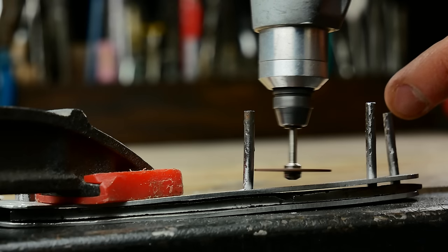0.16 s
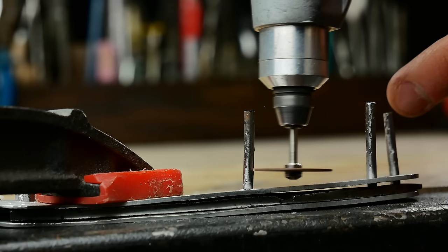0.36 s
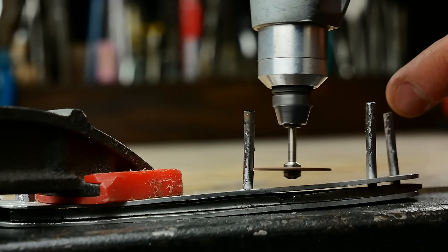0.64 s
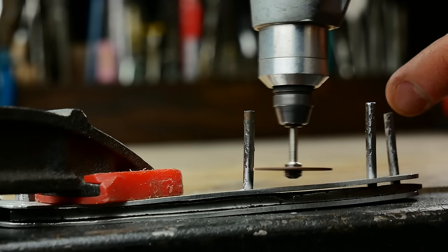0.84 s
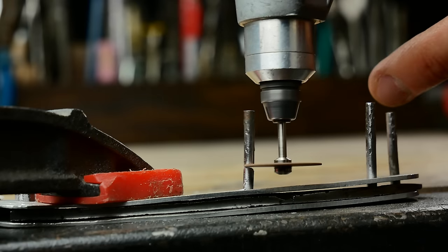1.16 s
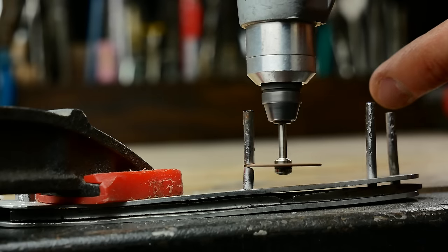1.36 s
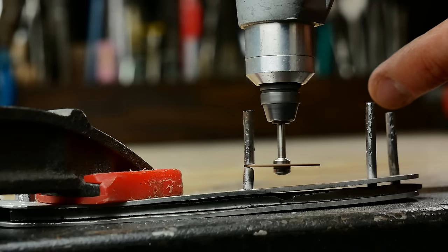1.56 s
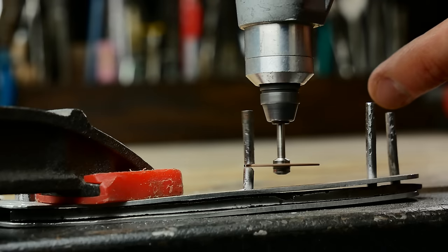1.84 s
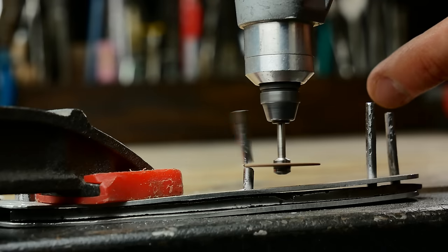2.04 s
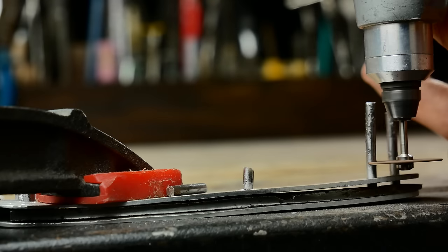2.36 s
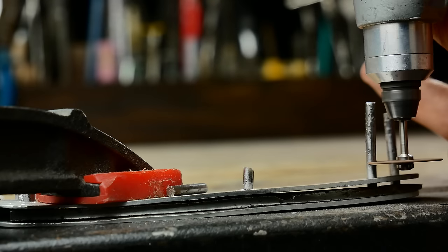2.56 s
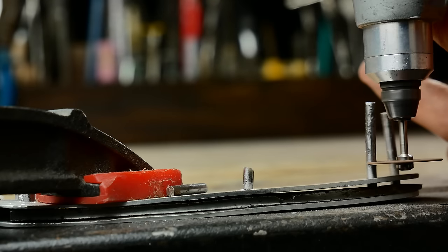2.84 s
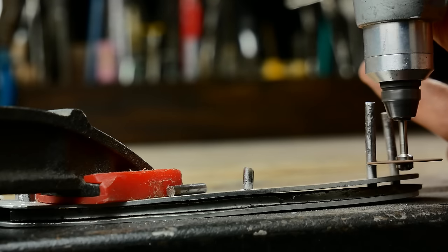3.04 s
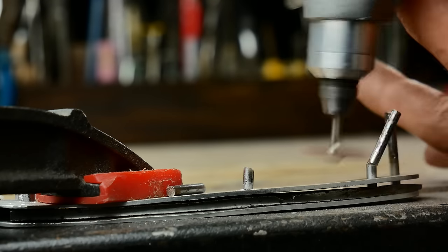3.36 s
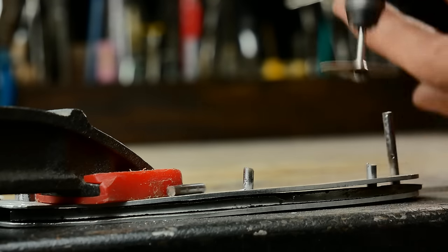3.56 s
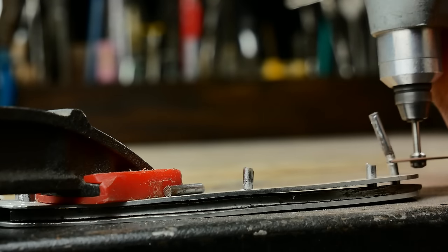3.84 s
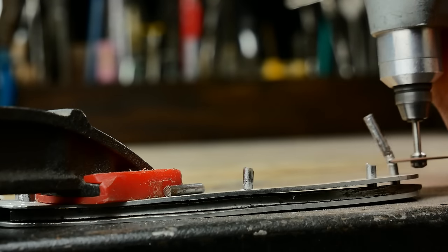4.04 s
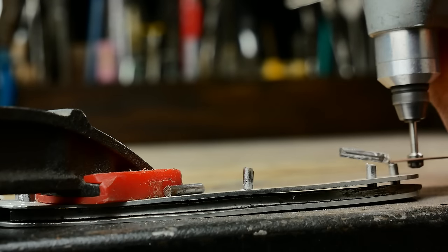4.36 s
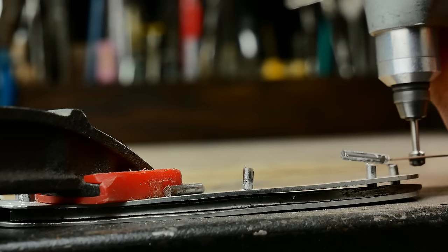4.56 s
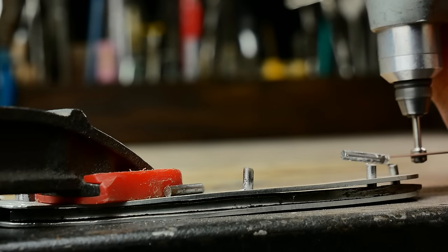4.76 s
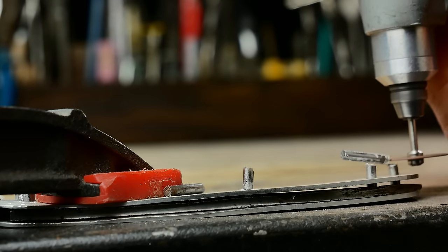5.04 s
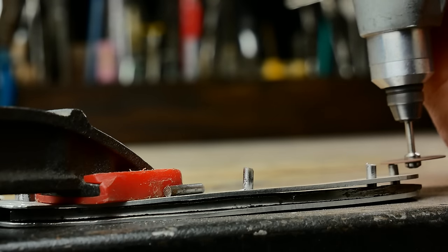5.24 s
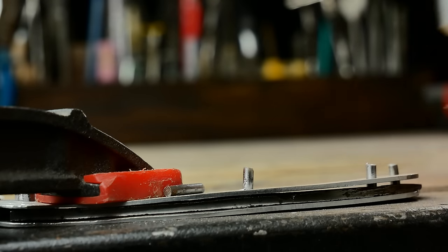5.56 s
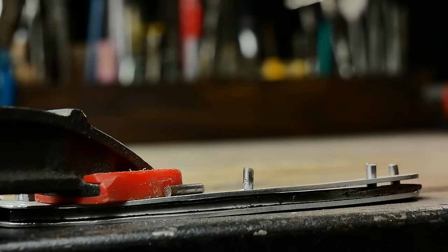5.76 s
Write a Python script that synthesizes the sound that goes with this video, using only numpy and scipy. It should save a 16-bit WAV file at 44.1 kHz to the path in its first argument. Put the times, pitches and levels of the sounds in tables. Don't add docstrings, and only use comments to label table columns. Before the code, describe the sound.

Close-up workshop metal cutting: a dragging, catching disc, then three abrupt high-speed grinding cuts, with snapping stubs, small metallic bounces and a free-running motor.

```python
import sys
import numpy as np
from scipy import signal
from scipy.fft import rfft, irfft, next_fast_len
from scipy.io import wavfile
from scipy.ndimage import uniform_filter1d, map_coordinates

SR = 44100
rng = np.random.default_rng(int(sys.argv[2]) if len(sys.argv) > 2 else 0)


def materialize(psi):
    bounded = np.clip(np.atleast_2d(psi).T, -1, 1)
    quanta = np.round(bounded * 32767).astype(np.int16)
    wavfile.write(sys.argv[1], SR, quanta)


def elevation(decibels):
    levels = np.asarray(decibels, float)
    return 10 ** (levels / 20)


N = 259749

STRETCH_S = [
    0,
    1.0015,
    2.4415,
    3.8015,
    5.9,
]

# first t/s, last t/s, first peak/dB, last peak/dB, length/ms
RUNS = [
    (0.174, 0.218, -22, -27, 0.55),
    (0.254, 0.345, -32, -28, 1.9),
    (0.6473, 0.784, -25, -33, 1),
    (0.842, 0.9816, -32, -33, 2.3),
]
# t/s, peak/dB, length/ms
BITES = [(.0098, -22.5, 1.5), (.0172, -20, 0.71), (.0327, -23, 1), (.04, -32, 1.1), (.0464, -32, 0.95),
         (.0616, -29, 1.3), (.0764, -31, 1), (.0822, -27, 2.4), (.0955, -30, 2.5), (.117, -32, 2.3),
         (.119, -29, 1.8), (.1444, -35, 2.2), (.149, -39, 2.3), (.179, -35, 1.4), (.2106, -39, 1.2),
         (.2328, -32, 2.4), (.2497, -30, 4.1), (.276, -26, 0.77), (.3, -20.5, 0.87), (.322, -27, 1.7),
         (.5944, -22, 1.6), (.5985, -19, 1.7), (.6186, -21, 2), (.668, -29, 0.66), (.6878, -21, 1.8),
         (.7132, -18, 0.84), (.753, -38, 1.6), (.775, -21.5, 1.8), (.782, -24, 2), (.797, -21.5, 1.9),
         (.8143, -33, 1.6), (.8205, -35, 1.6), (.8284, -43, 1.7), (.889, -21, 0.49), (.9113, -14.5, 0.56)]
# t/s, peak/dB, length/ms
LISTED_RUN = [(0.366, -25.5, 2.4), (0.389, -28, 2.6), (0.4137, -23, 1.9), (0.436, -21, 1.8), (.4595, -24, 2.6),
              (.484, -21.5, 1.2), (0.506, -21.5, 1.9), (.53, -23, 1.7), (0.5539, -19.5, 1.2), (.577, -25, 1.2)]
# f/Hz, density/dB
CATCH = [(300, -32.5), (820, -11.5), (1200, -13.5), (2900, -4), (3650, -5), (4400, -7.5), (5200, -9.5),
         (7250, 8.5), (8500, 6.5), (10300, -6), (11500, -9.5), (13400, -10), (14700, -6.5), (15600, -16.5)]
# f/Hz, width/Hz, level/dB, rise/(dB/s)
EDGE_RING = [
    (7760, 1000, -12, 3.5),
    (3040, 1800, -24, -12),
]
# t/s, level/dB
DRAG_DB = [(0, -34.5), (.5, -35), (1, -38.5)]
# f/Hz, density/dB
DRAG = [(20, -75.5), (60, -36), (230, -12.5), (700, -1.5), (1150, -6), (1600, 0.5), (2500, 0.5),
        (4400, 0.5), (5200, -5), (6300, -7), (8400, -6), (10300, 3), (11000, -9), (13500, -11),
        (15500, -5.5)]
SLOW_TURNS_PER_S = 43.5
USUAL_DB = -26
BODY_DB, BODY_GROWS, TOP_DB, TOP_GROWS, SCATTER_DB = -5, 0.062, 0.5, 0.31, 1.5

# f/Hz, t60/s
SHOP = [(200, 0.88), (4000, 0.4), (12000, 0.0087)]
DIP_SHARE = [.7, .8, .45, .4]

# t/s, speed/(turns/s)
SPEED = [
    [(1, 123.2), (1.26, 127.4), (1.4, 131.2), (1.63, 140), (1.95, 142.5), (2.1, 140), (2.22, 135.5),
     (2.34, 142.7), (2.44, 143.7)],
    [(2.45, 106.3), (2.56, 107.4), (2.9, 103.2), (2.98, 104.6), (3.2, 104.6), (3.4, 103.5), (3.48, 99),
     (3.56, 125), (3.67, 142)],
    [(3.8, 127.8), (4.03, 129.6), (4.21, 128), (4.41, 131.5), (4.55, 136.7), (4.62, 141.8), (5.28, 143),
     (5.45, 139.7), (5.6, 142.6)],
]
# shaft multiple, level/dB rms
WHINE = [(2, -90), (24, -60.5), (31, -70), (33, -69), (36, -64), (37, -64), (47, -66), (49, -68), (59, -72),
         (60, -70), (72, -72)]
# shaft multiple, level/dB rms
TWELFTH = [(12, -64.5)]
TWELFTH_DB = [-21, 1, -1.5]
# f/Hz, density/dB
AIR = [(18, -95.5), (30, -67), (102, -32), (200, -30), (399, -20.5), (709, -6), (970, -9), (1170, -9),
       (1400, -9.5), (1680, -5.5), (2130, -9), (3200, -12), (3700, -10), (4000, -7.5), (5170, -11),
       (5700, -7), (6500, -7), (9400, -9), (10500, -7.5), (15500, -15.5)]
# f/Hz, width/Hz, level/dB, rise/(dB/s)
AIR_RINGS = [(4560, 200, -19, 8), (5200, 120, -19, 4), (6800, 270, -15, 1), (8280, 680, 1.5, -3)]
# t/s, air/dB, whine/dB
MOTOR = [(1, -47.5, 2), (1.7, -45, 5), (1.78, -48, 3.5), (2.08, -43, 9), (2.3, -46.5, 6), (2.44, -49, -3),
         (2.45, -34.5, 3), (3.8, -48.5, -1), (4.7, -47, 2), (5.25, -43, 6), (5.6, -43, 4.5),
         (5.89, -43.5, 7.5)]
FREE_SHAKE_DB = -87
LOADED_SHAKE_DB = [-76, -74, -81, -61]

# t/s, pressure (pin rasp)/dB, skim (rim hiss over rasp)/dB
PUSH = [(1.02, -33.5, 3), (1.2, -32, 4.5), (1.32, -31.5, 3.5), (1.52, -35.5, 7), (1.56, -42, 9),
        (1.6, -50, 12.5), (1.63, -70, 10)]
BREAK = [(2.07, -68, 8), (2.111, -35, 7.5), (2.145, -35.5, 7), (2.175, -28, 2.5), (2.24, -30, 3.5),
         (2.265, -42.5, -3), (2.3, -45.5, 0.5), (2.34, -51, -14)]
SECOND = [(2.46, -32.5, 2.3), (2.6, -31.5, 2.5), (3.3, -27.5, 1.3), (3.501, -27.5, 5), (3.56, -37, 4),
          (3.575, -38.5, -11), (3.6, -40.5, 0.5), (3.64, -50, -5), (3.68, -51, -27)]
THIRD = [(3.815, -35, 0.5), (3.87, -33, 0), (4.18, -30.5, 1), (4.35, -32, 3.5), (4.51, -32.5, 0.8),
         (4.54, -34, 1), (4.57, -40, -6), (4.61, -46.5, -10), (4.66, -63, 4)]
GRAZE = [(5.33, -26.5, -28), (5.35, -45, 18), (5.38, -41, 9), (5.4, -42, 4), (5.43, -40.5, 7.5),
         (5.49, -42, 5), (5.52, -58, 9), (5.55, -81, 8)]
# start t/s, length/s, pressure/dB, skim/dB
TOUCHES = [
    (1.597, 0.072, -38.5, 9.5),
    (1.669, 0.068, -34.5, 7),
    (1.75, 0.097, -43, 11.5),
    (1.862, 0.053, -48, 17),
    (1.949, 0.092, -44, 16.5),
    (2.017, .045, -41.5, 13),
    (2.066, 0.026, -41.5, 15),
]
LAND_S, SAG_DB_PER_S, LEAVE_DB_PER_S = 0.01, 58.5, 697
# f/Hz, density/dB
COLOURS = [
    [(150, -44), (380, -29), (800, -18.5), (1600, -16), (2400, -4.5), (3200, -6.5), (4300, -8), (5000, -4),
     (6000, -5), (7000, -10), (8500, -8.5), (9700, -5.5), (10350, -3), (11100, -4), (15500, -10)],
    [(88, -85), (150, -82), (308, -27.5), (519, -15), (668, -21.5), (827, -1.5), (1130, -13), (1340, -12.5),
     (1600, -5), (6470, -5), (7560, 0.5), (10700, -3.5), (12800, -7.5), (15500, -8)],
    [(88, -59), (150, -26), (213, -66), (381, -20), (595, -19), (781, -10), (1110, -13), (1760, 1.5),
     (2180, -1), (4220, 1), (5130, 0), (8330, -4), (15500, -0.5)],
    [(88, -52), (150, -31), (285, -23), (339, -54), (411, -19), (1020, -12), (1370, -6), (5330, -9),
     (9540, -7), (15500, 1)],
]
# f/Hz, width/Hz, level/dB, rise/(dB/s)
RINGS = [
    [(3910, 130, -7, -10), (4270, 120, -6, -2), (4530, 280, 0.5, -5), (5620, 660, -18, 7),
     (2570, 170, -11, -11), (7010, 110, 5, 2.5), (7540, 160, 5.5, 3), (8150, 99, -1.5, 5.5),
     (8530, 120, 3, -6), (6350, 110, -12, 6)],
    [(2290, 72, -16.5, 10.5), (4250, 38, -7, 3), (4510, 51, -4.5, 1.5), (5350, 51, -11, 4),
     (7500, 450, -9, 0.5), (9600, 110, -14, -5), (13000, 590, 6, -2.5)],
    [(1420, 26, -8.5, 16.5), (1770, 32, -11, -6), (3300, 30, -8, 4), (3880, 33, -10, -13),
     (4290, 55, 0, -11), (8270, 1730, 10, -7)],
    [(8900, 1800, 15, -2)],
]
RIMS = [
    [-28, -34, -11.5, -11.5, -37, -3, -5, -23, -5, -13, -25, -19, -14, -17, -21, -23, -20, -14, -12, 0, -1,
     -7, -10, -7, -20, -1, -14, -4, -12, 8, 6, -2, 10.5, -2, 10, 2, -2],
    [-24, -40, -12.5, -13, 4, -3, 9, 5, 5.5, -28, -2.5, -9, -20, 1.5, 3, -6, -11, -19, -21, -18, -1, -5,
     -16, -6, 4, -6, -17, -12, -15, -25, -17, -6, 5, -5, -10, -2, -14, -13, 6, -7, -5, -16, 0, -11],
    [-51, -61, -19.5, -37, -22, -10, -19, -16, -40, -33, -0.5, -6, -15, 5, -18, -26, -29, -30, -4, -24, -18,
     -6, -5, -7, -2, -4, -23, -23, -19, 0, -16, -1, 7, 0],
    [-30, -11, -2],
]
# shaft multiple, rise/(dB/s)
RIM_CHANGE = [
    [(31, -8), (35, -2)],
    [(5, 3), (7, -12), (8, -2), (9, -9), (15, -5), (16, 4), (22, 5)],
    [(11, -3), (14, -13), (26, 2), (30, 3), (33, 2)],
    [(1, 0)],
]
RIM_DB = [-3, -11, -8, -20]
RIM_WEAR_DB_PER_S = [4.9, 6.9, 1.4, .3]
RIM_GONE_S = [2.3, 3.45, 4.3, 5.6]
RIM_GOES_DB_PER_S = 30
REPEATING = [.9, .7, .6, .4]
# throb depth, added depth per dB of skim
THROBS = [
    (.13, .055),
    (.1, .01),
    (.2, .02),
    (.3, .02),
]
# level at full pressure/dB, share of pressure followed, loss per dB of skim/dB
DRONE = [
    (-56, 0.44, -0.23),
    (-34.5, 2.1, 2.5),
    (-54.5, 0.78, -1.65),
    (-60, 0.11, -1),
]
# shaft multiple, level against hiss/dB
SKIM_LINES = [(47, -19), (48, -16), (49, -13), (52, -19), (53, -16), (58, -21)]

# t/s, f/Hz, level/dB, t60/s
RING_OUTS = [
    (1.714, 842, -44, 0.18),
    (4.53, 1380, -53, .4),
]
# t/s, peak/dB, body/dB, top/dB, length/ms
SNAPS = [(2.2837, -26.5, -29, -17, 2.3), (3.5694, -23, -3.5, -5, 6.5), (3.581, -17, -7, 2, 1.4),
         (5.2928, -20.5, -1, -2, 1.8), (5.296, -18, 3, -2, 2), (5.3022, -19.5, -3, -15, 3.5),
         (5.32, -16.5, -10, -5, 2.6), (5.345, -26.5, -4, -8, 6.2), (5.3672, -21.5, -28, -31.5, 2),
         (5.5894, -46, -8, -29, 1.6), (5.7344, -50, -3, -12, 1.6)]
# f/Hz, density/dB
SNAP = [(410, -30), (700, -22), (1120, -52), (1480, 2.5), (2490, -6), (3230, 1.5), (5020, -5), (7900, -4),
        (10800, -11.5), (15500, -13)]

# f/Hz, level/dB
MIC = [(20, -15), (90, -3.5), (15650, -1.5), (15950, -50), (22000, -90)]
MASKED_DB, MASK_DROP_DB, BASS_MASKED_DB = -6, -16, -31


def evened(x):
    return x / np.sqrt(np.mean(x ** 2) + 1e-20)


def read(points, hz):
    f, value = np.transpose(points)
    return np.interp(np.log(hz + 1), np.log(f + 1), value)


def wander(count, hz):
    knots = rng.standard_normal(int(count / SR * hz) + 4)
    return np.interp(np.arange(count) * hz / SR, np.arange(len(knots)), knots) * 1.2


def coloured(x, colour, rings=(), patchy_db=2.):
    hz, t, z = signal.stft(x, SR, nperseg=1024, noverlap=768)
    patches = uniform_filter1d(rng.standard_normal(z.shape), size=5, axis=0)
    patches = evened(uniform_filter1d(patches, size=16, axis=1))
    gain = elevation(read(colour, hz)[:, None] + patchy_db * patches)
    for f, width, db, rise_db in rings:
        swell = evened(uniform_filter1d(rng.standard_normal(len(t)), size=14))
        db = db + rise_db * np.minimum(t, 1.6) + 1.2 * swell
        detune = (hz[:, None] - f) / (width / 2 + 15)
        gain = gain * (1 + elevation(db + 6.5) / (1 + detune ** 2))
    y = signal.istft(z * gain, SR, nperseg=1024, noverlap=768)[1]
    return evened(y[:len(x)])


def split(x, low_hz, high_hz):
    size = next_fast_len(len(x))
    z, hz = rfft(x, size), np.fft.rfftfreq(size, 1 / SR)
    low = 1 / (1 + (hz / low_hz) ** 12)
    high = 1 - 1 / (1 + (hz / high_hz) ** 24)
    return [irfft(z * g, size)[:len(x)] for g in (low, 1 - low - high, high)]


def catches():
    rows = []
    for first_s, last_s, first_db, last_db, ms in RUNS:
        count = round((last_s - first_s) * SLOW_TURNS_PER_S) + 1
        rows.append(np.linspace((first_s, first_db, ms), (last_s, last_db, ms), count))
    s, db, ms = np.vstack(rows + [BITES, LISTED_RUN]).T
    body, top = SCATTER_DB * rng.standard_normal((len(s), 2)).T
    extra_db = db - USUAL_DB
    body_db = BODY_DB - (1 - BODY_GROWS) * extra_db + body
    top_db = TOP_DB - (1 - TOP_GROWS) * extra_db + top
    return np.transpose([s, db, body_db, top_db, ms])


def bursts(t, events, colour, rings=()):
    s, peak_db, body_db, top_db, ms = np.transpose(events)[:, :, None]
    u = np.arange(2000) / SR
    swell = 1000 * u / np.maximum(ms, .3)
    scrape = (1.27 * swell * np.exp(1 - 1.406 * swell)) ** 0.63
    shape = scrape + 0.12 * (1 - np.exp(-swell)) * np.exp(-u / 0.0084)
    grit = rng.standard_normal(len(t)) * elevation(.6 * wander(len(t), 1600))
    body, edge, top = split(coloured(grit, colour, rings, patchy_db=1.5), 5500, 10500)
    at = np.round((s - t[0] - .0005) * SR).astype(int) + np.arange(2000)
    keep = (at >= 0) & (at < len(t))
    out = np.zeros(len(t))
    for band, db in ((body, body_db), (edge, 0), (top, top_db)):
        event_power = (elevation(peak_db + db - 0.1) * shape) ** 2
        power = np.bincount(at[keep], event_power[keep], len(t))
        out += np.sqrt(power) * evened(band)
    return out


def chatter(t):
    drag = coloured(rng.standard_normal(len(t)), DRAG, patchy_db=4.2)
    drag *= elevation(np.interp(t, *np.transpose(DRAG_DB)))
    return drag + bursts(t, catches(), CATCH, EDGE_RING)


def shop(x):
    taps = np.zeros(16000)
    taps[np.arange(120, 15980, 20) + rng.integers(0, 20, 793)] = rng.choice([-1., 1.], 793)
    hz, t, z = signal.stft(taps, SR, nperseg=256)
    decay = elevation(-60 * t / read(SHOP, hz)[:, None])
    tail = signal.istft(z * decay, SR, nperseg=256)[1]
    return signal.fftconvolve(x, tail / np.linalg.norm(tail))[:len(x)]


def orders(turns, table, drift_hz, drift_db, slip):
    out = 0
    for k, db in table:
        level = elevation(db + drift_db * wander(len(turns), drift_hz)) * np.sqrt(2)
        drift = slip * np.sqrt(k) * wander(len(turns), drift_hz)
        out = out + level * np.cos(2 * np.pi * (k * turns + rng.random()) + drift)
    return out


def motor(t, turns, k):
    s, air_db, whine_db = np.transpose(MOTOR)
    air = coloured(rng.standard_normal(len(t)), AIR, AIR_RINGS, patchy_db=2)
    shake = elevation(FREE_SHAKE_DB) * np.sqrt(2) * np.cos(2 * np.pi * turns)
    whine = orders(turns, WHINE, 14, 2, .12)
    whine = whine + elevation(TWELFTH_DB[k]) * orders(turns, TWELFTH, 12, 1.8, .25)
    return elevation(np.interp(t, s, air_db)) * air + elevation(np.interp(t, s, whine_db)) * whine + shake


def hand(t, k):
    s, press_db, skim_db = np.transpose([PUSH + BREAK, SECOND, THIRD, GRAZE][k])
    rasp_db = np.interp(t, s, press_db)
    hiss_db = np.interp(t, s, press_db + skim_db)
    for start, length, db, over_db in TOUCHES:
        u = t - start
        land_db = 20 * np.log10(np.clip(u / LAND_S, 1e-4, 1))
        leave_db = LEAVE_DB_PER_S * np.maximum(u - length, 0)
        touch_db = db + land_db - SAG_DB_PER_S * u - leave_db
        rasp_db = np.maximum(rasp_db, touch_db)
        hiss_db = np.maximum(hiss_db, touch_db + over_db)
    return rasp_db, hiss_db, s[-1]


def rim_grit(turns, wear_turns, count=200):
    grains = rng.standard_normal((int(turns[-1] / wear_turns) + 2, count))
    grains = np.hstack([grains, grains[:, :1]])
    return evened(map_coordinates(grains, [turns / wear_turns, turns % 1 * count], order=1))


def grind(t, turns, k, lift_s=0.047):
    rasp_db, hiss_db, end_s = hand(t, k)
    over_db = hiss_db - rasp_db
    push_db = rasp_db - rasp_db.max()
    bite_db = .9 * np.minimum(push_db + 5, 0)
    full_db, follows, skim_loss = DRONE[k]
    drone_db = full_db + follows * np.minimum(push_db + 6.5, 0) - skim_loss * np.maximum(over_db + 0.5, 0)

    throb = np.clip(THROBS[k][0] + THROBS[k][1] * over_db, 0, 1.3)
    high_spot = np.exp(throb * (1 + 0.031 * wander(len(t), 53.5)) * np.cos(2 * np.pi * turns))
    high_spot /= np.sqrt(uniform_filter1d(high_spot ** 2, size=1200))
    wear_db = RIM_WEAR_DB_PER_S[k] * np.maximum(t - STRETCH_S[k % 3 + 1], 0)
    grit = rng.standard_normal(len(t)) * elevation(0.83 * wander(len(t), 810))
    grit = grit + REPEATING[k] * elevation(bite_db - wear_db) * rim_grit(turns - turns[0], 6.)
    noise = coloured(grit * high_spot, COLOURS[k], RINGS[k], patchy_db=1.5)

    change = dict(RIM_CHANGE[k])
    age_s = np.clip(t - t[0] - .5, -.5, .6)
    bumps = [(n, db + change.get(n, 0) * age_s) for n, db in enumerate(RIMS[k], 1)]
    rim = evened(orders(turns, bumps, 12, 2, 0.045))
    gone_db = RIM_GOES_DB_PER_S * np.maximum(t - RIM_GONE_S[k], 0)
    rim_db = RIM_DB[k] + 1.6 * np.minimum(push_db + 1.8, 0) - wear_db - gone_db
    drone, rasp, hiss = split(noise + elevation(rim_db) * rim, 1190, 6250)

    skim_db = np.clip(over_db - 2.5, 0, 30)
    rasp = evened(rasp)
    rasp = rasp - (1 - elevation(-.7 * skim_db)) * split(rasp, 1200, 3730)[-1]
    if k == 0:
        disc, gap, top = split(evened(hiss), 8800, 11300)
        hiss = disc + elevation(-1.1 * skim_db) * gap + elevation(-.2 * skim_db) * top
        hiss = hiss + np.clip(skim_db / 6, 0, 1) * orders(turns, SKIM_LINES, 14, 3, .1)

    shake_db = LOADED_SHAKE_DB[k] + 0.8 * bite_db + np.minimum(over_db, 0)
    if k > 0:
        shake_db = shake_db + 3.5 * wander(len(t), 9.1)
    out = elevation(shake_db) * np.sqrt(2) * np.cos(2 * np.pi * turns)
    for db, band in ((drone_db, drone), (rasp_db, rasp), (hiss_db, hiss)):
        out = out + elevation(db) * evened(band)
    touching = np.clip((end_s + lift_s - t) / lift_s, 0, 1)
    return touching * out


def ring_outs(t):
    s, hz, db, t60 = np.transpose(RING_OUTS)[:, :, None]
    u = np.maximum(t - s, 0)
    level = elevation(db - 60 * u / t60) * np.minimum(u / 0.017, 1) * np.sqrt(2)
    return (level * np.sin(2 * np.pi * hz * u)).sum(0)


def scene():
    out, lead = np.zeros(N), 6000
    dip_band = signal.butter(2, [9950, 10750], "bandpass", fs=SR, output="sos")
    for k, (a, b) in enumerate(zip(STRETCH_S, STRETCH_S[1:])):
        i, j = round(a * SR), min(round(b * SR), N)
        t = np.arange(i - lead, j) / SR
        if k == 0:
            dry = chatter(t)
        else:
            turns = np.cumsum(np.interp(t, *np.transpose(SPEED[k - 1]))) / SR
            dry = motor(t, turns, k - 1) + grind(t, turns, k - 1)
            dry += ring_outs(t) + elevation(-6.5) * bursts(t, SNAPS, SNAP)
            late = (t > 5.295) & (t < 5.65)
            if late.any():
                fade_in = np.clip((t[late] - t[late][0]) / 0.082, 0, 1)
                dry[late] += fade_in * grind(t[late], turns[late], -1)
        wet = dry + elevation(-14) * shop(dry)
        wet -= DIP_SHARE[k] * signal.sosfiltfilt(dip_band, wet)
        out[i:j] = wet[lead:]
        out[i:i + 8] *= np.arange(8) / 8
    return np.array([out, out])


def roll_off(x):
    return signal.sosfilt(signal.butter(12, 16460, fs=SR, output="sos"), x)


def record(dry):
    hz, t, z = signal.stft(dry[0], SR, nperseg=1024, noverlap=768)
    power = uniform_filter1d(abs(z) ** 2, size=7, axis=1) + 1e-16
    around = uniform_filter1d(power, size=14, axis=0)
    around = np.minimum(np.roll(around, 9, axis=0), np.roll(around, -9, axis=0))
    under_db = 10 * np.log10(uniform_filter1d(power, size=3, axis=0) / around)
    bass_db = 10 * np.log10(power[2:5].mean(0) / power[20:340].mean(0))
    masked = np.clip((MASKED_DB - under_db) / 2, 0, 1) * (hz > 900)[:, None]
    bass_masked = np.clip((BASS_MASKED_DB - bass_db) / 2, 0, 1) * (t > STRETCH_S[1])
    masked += 2 * bass_masked * (hz < 230)[:, None]
    z = z * elevation(read(MIC, hz)[:, None] + MASK_DROP_DB * masked)
    chance = uniform_filter1d(rng.standard_normal(len(t) // 4 + 1), size=2)
    apart = np.repeat(chance > .3, 4)[:len(t)]
    side = z * np.exp(2j * np.pi * rng.random(z.shape)) * apart * elevation(-11.5)
    both = signal.istft(np.array([z + side, z - side]), SR, nperseg=1024, noverlap=768)[1][:, :N]
    return roll_off(both)


dry = scene()
out = record(dry)
materialize(out)
```